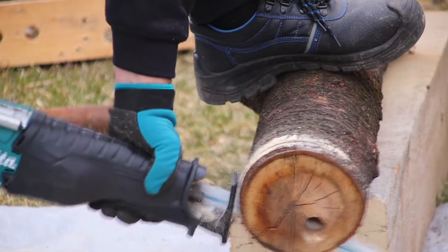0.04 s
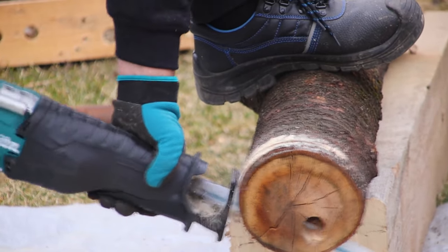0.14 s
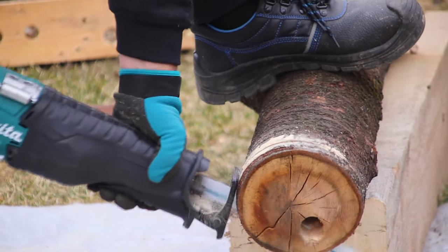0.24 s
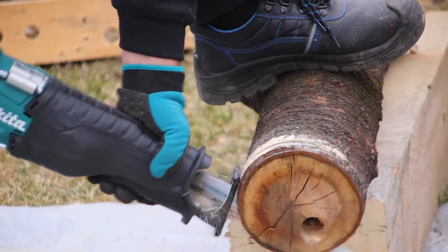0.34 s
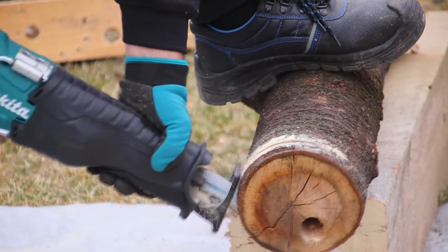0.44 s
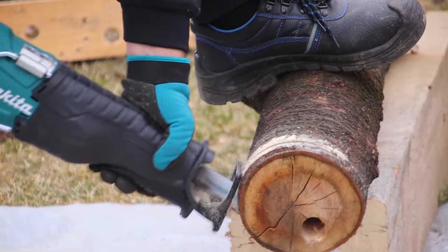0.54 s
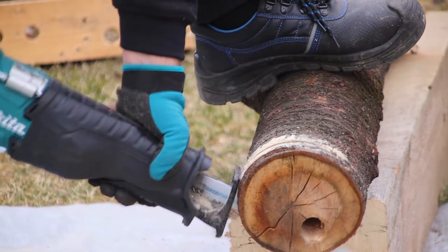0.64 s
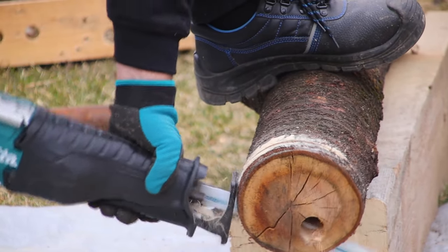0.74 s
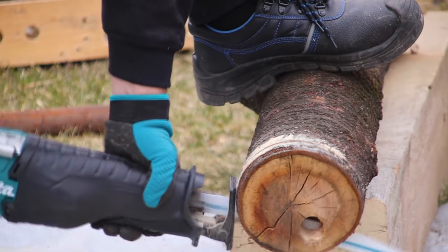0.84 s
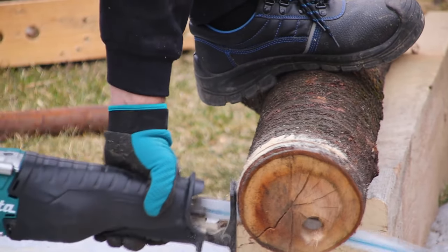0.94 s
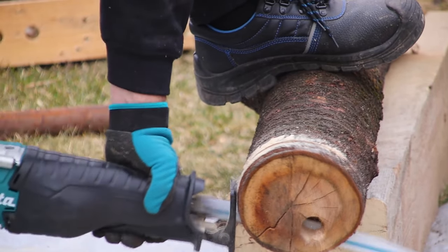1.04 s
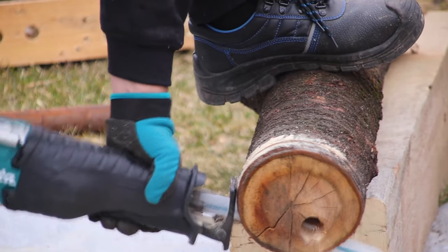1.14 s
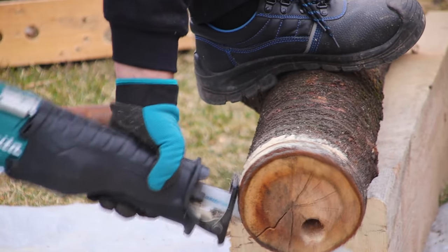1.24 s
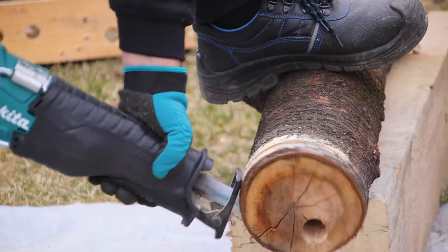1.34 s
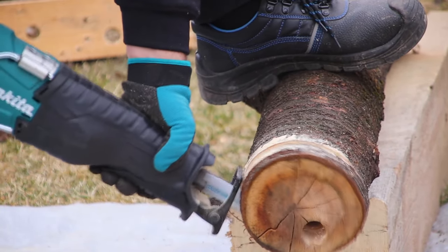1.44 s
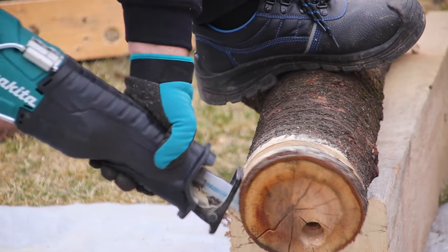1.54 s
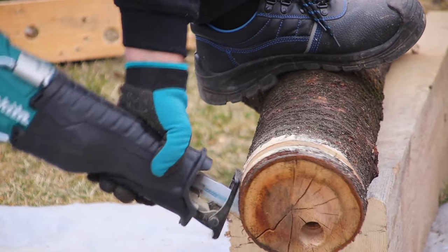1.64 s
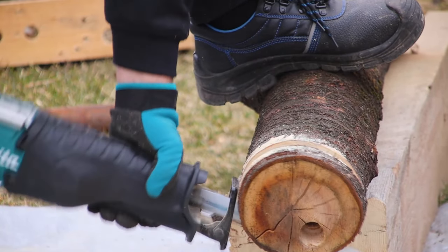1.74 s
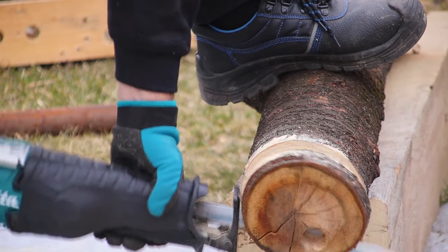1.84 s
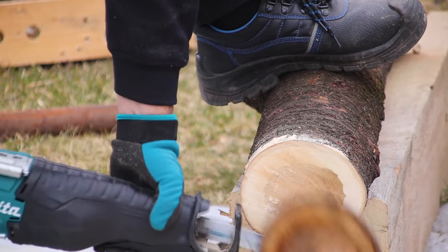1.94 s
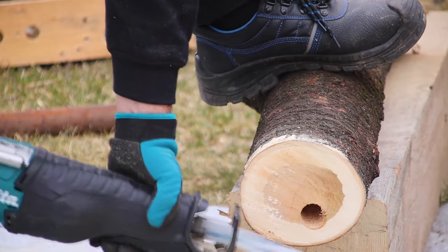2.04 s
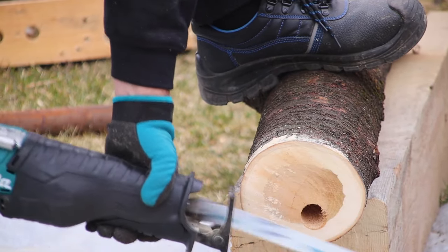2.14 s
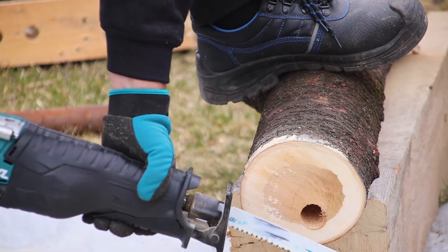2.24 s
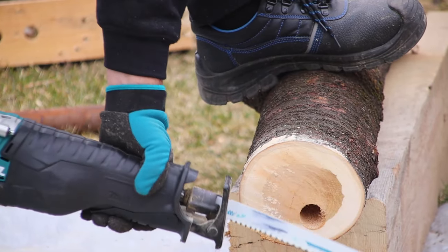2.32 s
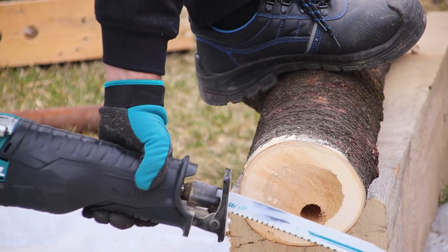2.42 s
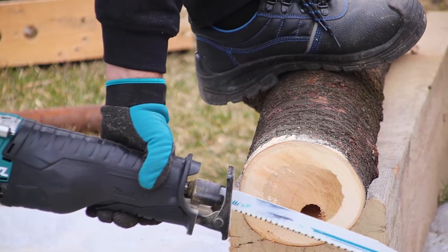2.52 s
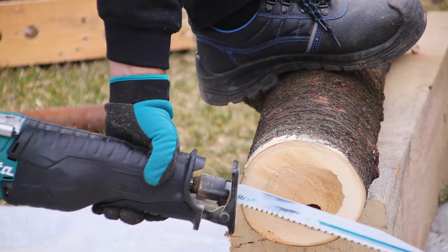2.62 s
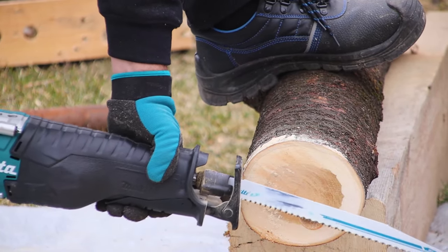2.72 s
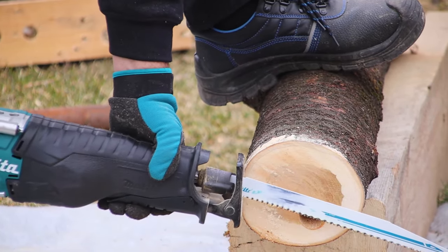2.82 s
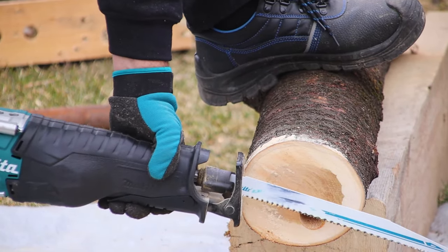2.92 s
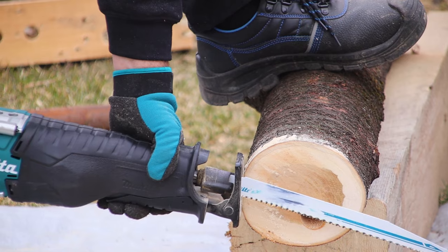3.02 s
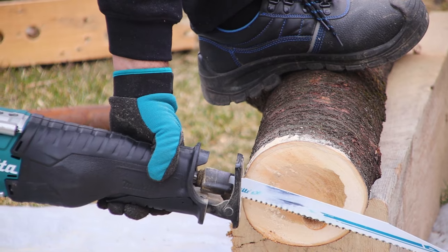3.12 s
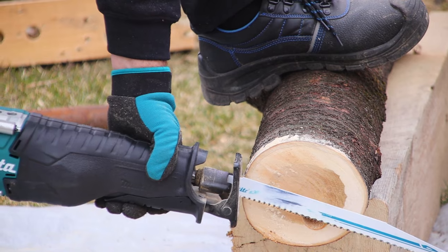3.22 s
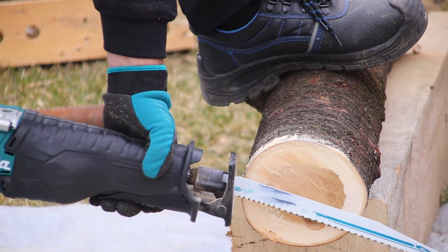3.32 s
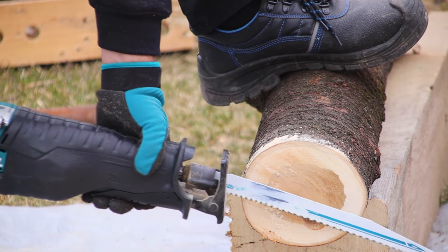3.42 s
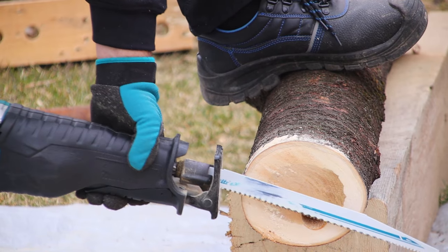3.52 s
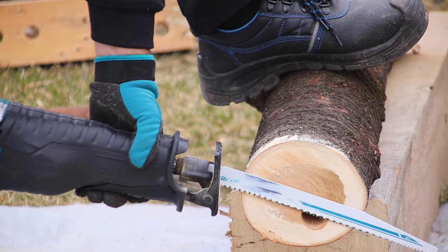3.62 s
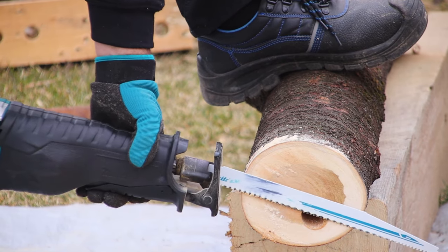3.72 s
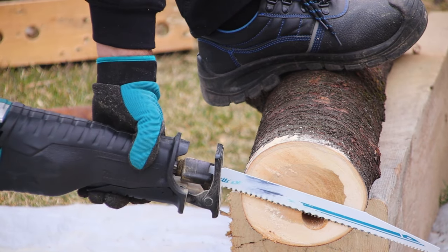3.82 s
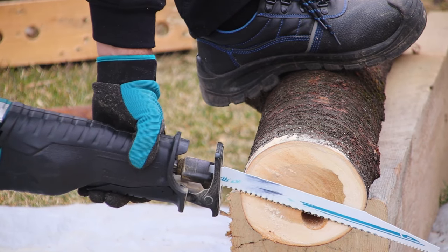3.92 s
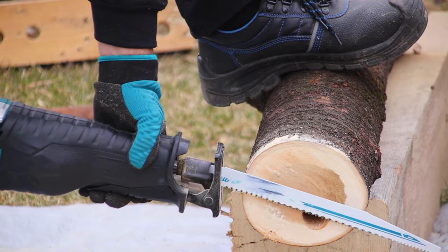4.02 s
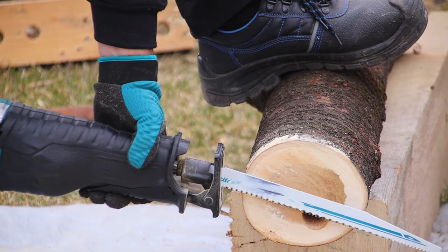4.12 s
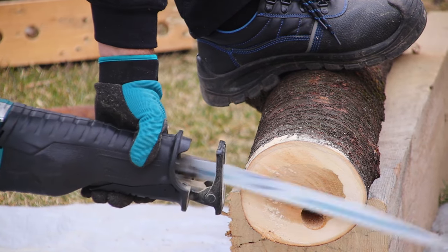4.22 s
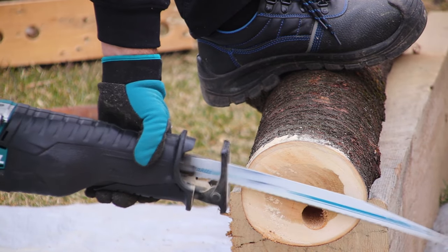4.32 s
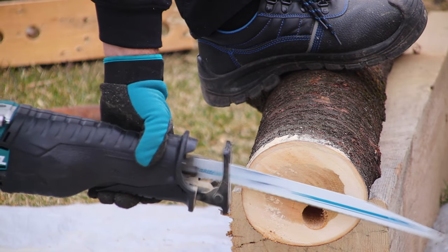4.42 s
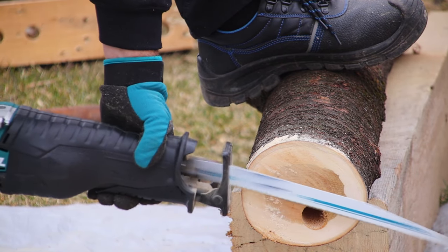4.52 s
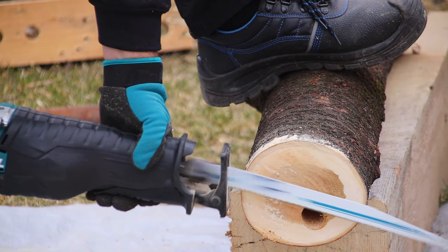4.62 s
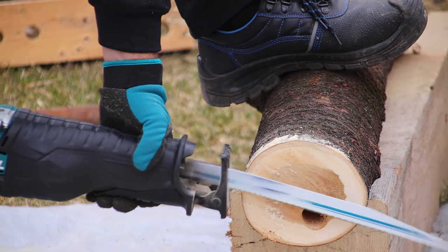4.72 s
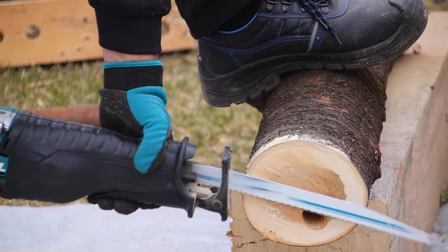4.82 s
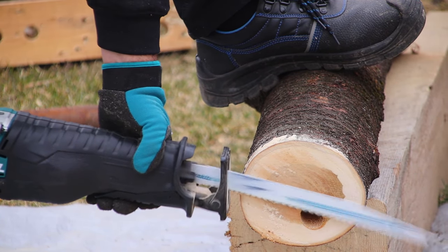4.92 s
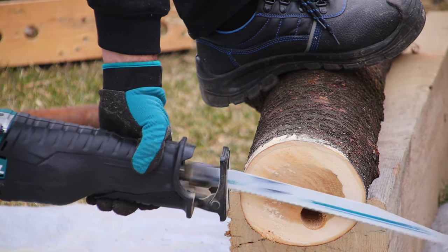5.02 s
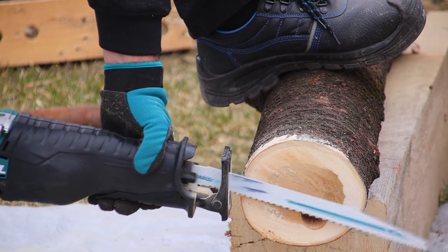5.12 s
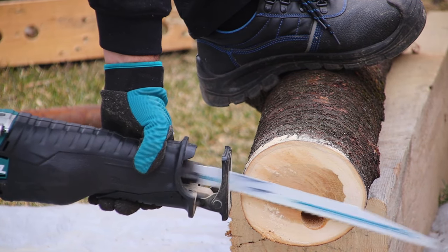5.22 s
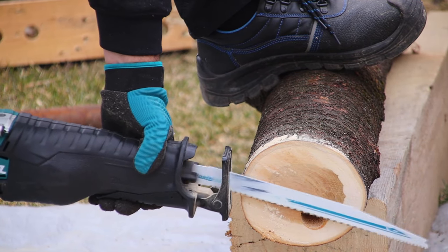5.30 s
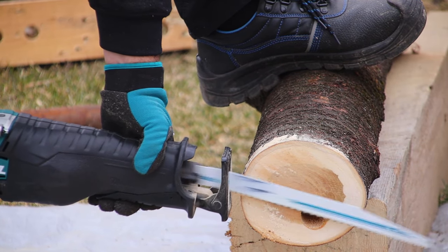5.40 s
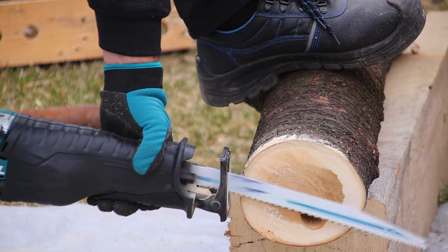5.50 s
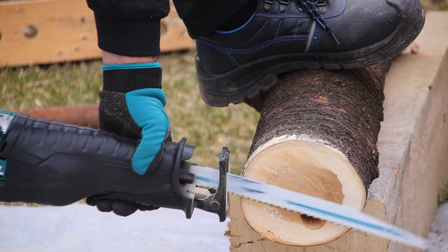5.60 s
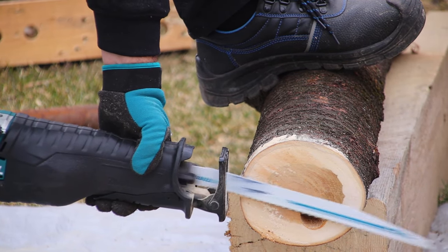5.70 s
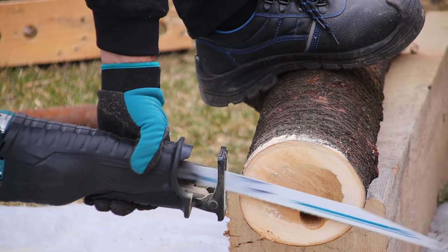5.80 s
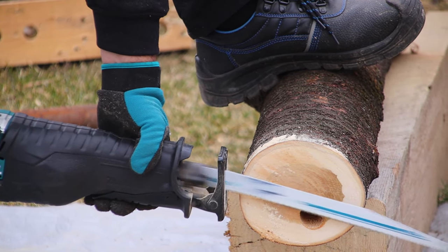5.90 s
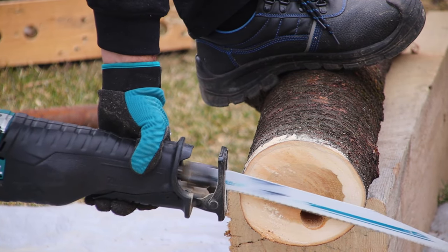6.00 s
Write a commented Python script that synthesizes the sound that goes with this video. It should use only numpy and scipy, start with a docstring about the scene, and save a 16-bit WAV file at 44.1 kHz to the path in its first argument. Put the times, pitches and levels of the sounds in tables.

```python
"""Outdoors, a cordless reciprocating saw cuts through a log; the slice drops off and the motor brakes.
The saw is shifted with scuffs and clicks, then revs up free and sinks to a slow chug, its motor drive singing.
One crank angle times the gear rattle, tooth rasp, shaking log and whines; shaped noise makes the rough
sounds and sine tones the pitched ones. A soft rush, a far hum and faint chirps lie behind."""
import sys
import numpy as np
from scipy import signal
from scipy.fft import rfft, irfft, next_fast_len
from scipy.io import wavfile
from scipy.ndimage import uniform_filter1d, map_coordinates

SR = 44100
rng = np.random.default_rng(int(sys.argv[2]) if len(sys.argv) > 2 else 0)


def put_to_file(sound):
    """Save the sound as 16-bit audio at rate SR, in the file named by the first command-line argument."""
    columns = np.atleast_2d(sound).T  # one column per channel
    safe = np.clip(columns, -1, 1)
    whole_steps = np.round(safe * 32767)
    wavfile.write(sys.argv[1], SR, whole_steps.astype(np.int16))


N = 267246

# Crank speed in the cut, sagging as the saw is pressed in: start_s, strokes_per_s
CUT_SPEED = [(0, 37.44), (.15, 34.54), (.3, 35.6), (.45, 34.48), (.6, 36.22), (.72, 36.95), (.82, 38.93),
             (.94, 39.84), (1.06, 36.38), (1.2, 37.19), (1.36, 37.23), (1.5, 37.43), (1.62, 38.78),
             (1.76, 42.1), (1.95, 40.59), (2.12, 44.5), (2.28, 42.91)]
# Crank speed of the free run, a rev and then a slow chug: start_s, strokes_per_s
FREE_SPEED = [(4.26, 0), (4.35, 25.16), (4.43, 33.6), (4.52, 39.48), (4.62, 33.96), (4.76, 29.54),
              (4.9, 24.98), (5.04, 19.56), (5.2, 13.59), (5.36, 9.63), (5.47, 9.12), (5.6, 11.13),
              (6.06, 10.98)]
CUT_ANGLE, FREE_ANGLE = 1, 0.39  # crank angle as each run starts (turns)
FULL_RATE = 36.07  # full throttle (strokes per second)
MOTOR_TURNS = 47 / 6  # motor turns per stroke
BRAKE_S, SWELL_IN_S = 0.067, 0.17  # brake to rest; the rattle swells in after a start
WOOD_LEFT_S, WOOD_FADE_S = 2.423, 0.35  # when the wood's hold on the blade has faded fully; fade length

# How hard the teeth bite as the saw is rocked: start_s, rasp_db
BITE = [(0, -38.5), (.17, -34), (.5, -34), (.78, -41), (.9, -58), (1.06, -42.5), (1.38, -37), (1.52, -48),
        (2.08, -46.5)]
# Colour of tearing wood: freq_hz, level_db (relative, per Hz)
TEETH_COLOUR = [(70, -53), (130, -6), (330, -10), (650, -7.5), (1000, -11), (2000, -12), (3300, 0),
                (4500, -5), (7000, -15), (10000, -33), (11700, -28), (15800, -21)]
# Resonances of the blade held in the cut: freq_hz, width_hz, lift_db (before the ring factor)
KERF = [(317, 27, 8), (493, 90, 5), (2710, 130, 9.5), (3180, 240, 1.5), (3420, 110, 4.5), (3800, 140, -4.5),
        (4540, 91, 0.5), (4960, 60, 5)]
FULL_BITE_DB = -35
CATCH_TURN, LIFT_TURN, CATCH_DB = 0.675, 0.61, 5  # angle of the catch, turns until the teeth lift, jolt
TEETH_PER_PULL, TOOTH_DECAY, TOOTH_FLOOR = 6, 0.3, 0.25  # count, decay in tooth spacings, steady share
SQUEAL_HZ, SQUEAL_DB, SQUEAL_GROWS = 3220, -43, 1.5  # centre pitch, level at full bite, power of the bite
BLADE_HZ, BLADE_DB = 320, -63.5  # bending hum: resonance, level at full bite away from it

# Colour of the rattle at speed: freq_hz, level_db (relative, per Hz)
FAST_COLOUR = [(35, -61), (60, -31), (200, -15), (436, -11), (632, -14), (897, -2.5), (1330, -3),
               (1850, -6.5), (2500, -5), (3720, -7.5), (4180, -9), (6510, -11.5), (9910, -13), (13100, -13),
               (15800, -20)]
# Colour of the rattle at a slow chug: freq_hz, level_db (relative, per Hz)
SLOW_COLOUR = [(59, -22), (100, -19), (450, -9.5), (650, -10), (1190, 1), (2090, -3), (2800, -6),
               (3400, -5.5), (3950, -12.5), (7600, -7), (8700, -13), (10000, -26.5), (12400, -37),
               (15000, -22)]
# Resonances of housing and blade: freq_hz, width_hz, lift_db (before any ring factor)
HOUSING = [(636, 52, -8), (880, 140, 4.5), (1460, 130, 2.5), (1950, 210, -4.5), (2120, 280, 5),
           (2800, 130, 2), (3630, 220, 3), (5180, 340, 4.5), (6420, 300, 3.5), (7720, 290, 4),
           (8420, 240, 5.5), (10100, 360, -7.5), (13100, 110, -9)]
# Resonances that ring out at a slow chug: freq_hz, width_hz, lift_db
CHUG_RING = [(857, 190, 6), (1855, 210, -7.5), (2105, 105, 13), (3425, 92, 11), (3670, 50, 8),
             (5000, 250, 8.5), (5300, 150, -4), (5840, 70, 2), (6590, 250, 10.5), (6950, 150, -13),
             (7600, 80, 7)]
# The slack slider clatters twice a turn at a slow chug: start_turn, length_turns, strength
CLATTER = [(0.93, 0.27, 0.95), (0.49, 0.21, 0.6)]
# Gearbox growl, relative to the rattle: stroke_multiple, level_db
GROWL = [(9, -26), (10, -26), (12, -26), (14, -27)]
# The hollow of the housing lifts the growl: freq_hz, width_hz, lift_db
HOLLOW = [(445, 38, 6.5)]
# Rattle: a floor at idle, a power of speed above it (both before make-up gain)
IDLE_DB, FULL_DB, RATTLE_GROWS = -44.5, -33, 2.25
WOOD_DAMPS_DB, LOAD_ADDS_DB, RELEASE_T60_S = 4, 1.93, 0.3

# Whine of motor and pinion, relative to the rattle: motor_multiple, cut_db, free_db
WHINE = [(1.5, -25, -26), (3, -21, -24), (5, -24, -23), (6, -17, -25), (8, -17, -23), (12, -22, -40),
         (13, -26, -42), (16, -28, -21)]
# Gearbox resonances that lift the whine: freq_hz, width_hz, lift_db (halved fully in wood)
GEARBOX = [(1750, 170, 10), (3700, 380, 23)]
# Drive tones: switching_multiple, stroke_multiple (added), level_db (relative)
SIDEBANDS = [(1, -46, -10), (1, -32, -5), (1, -8, -5), (1, 8, -8), (1, 32, -6), (2, -32, -17),
             (2, -52, -20), (2, -64, -17)]
# Drive level, slowing at which the motor coasts (strokes per second per s), power of current
DRIVE_DB, COAST_RATE, DRIVE_GROWS = -52, 14, 0.091
# Motor buzz under its starting current: start_s, level_db
START_LEVEL = [(4.255, -71), (4.3, -39.5), (4.345, -43.5), (4.41, -70)]
# Colour of that buzz: freq_hz, level_db (relative, per Hz)
START_COLOUR = [(700, -32), (2000, -12), (3000, 4), (3900, -2), (5000, -6), (8000, -11), (10000, -40)]

# The log shaken by the strokes: stroke_multiple, level_db (relative)
LOG = [(1, -43), (2, -20), (3, -5.5), (4, -2.5), (5, 1), (6, 1), (7, -1.5), (8, -10), (9, -18), (10, -10.5),
       (11, -24), (12, -19.5), (13, -32), (14, -5.5)]
# The log's own resonances: freq_hz, width_hz, lift_db
LOG_MODES = [(121.3, 8.6, 5.5), (189.6, 11.3, 8)]
# How hard the log shakes: start_s, level_db (before a trim)
SHAKE = [(0.0, -45), (0.04, -37.5), (0.5, -50), (0.85, -38.5), (0.9, -45), (1.08, -35.5), (1.47, -42),
         (1.52, -40), (2.08, -50.5)]
# The shoe slaps the log at both ends of the pull: angle_turns, level_db (at full bite)
SLAPS = [(.68, -34.5), (.21, -28)]
SLAP_TURNS = 0.072  # decay of a slap
# The slack slider knocks: start_s, peak_db
KNOCKS = [(4.4868, -18), (4.593, -19), (5.082, -29), (5.1325, -28.5), (5.1428, -24), (5.175, -32),
          (5.215, -29), (5.249, -26), (5.438, -35)]
# Colour of knocks and slaps: freq_hz, level_db (relative, per Hz)
KNOCK_COLOUR = [(100, -23), (500, -10), (900, 2), (2500, -4), (4000, -12.5), (8000, -14), (11000, -21),
                (15800, -22)]
# Dull wooden bumps: start_s, level_db, pitch_hz, t60_s (of the lowest mode)
BUMPS = [(2.13, -32.5, 128, 0.065), (2.151, -30.5, 250, 0.043), (2.761, -36, 122, 0.047),
         (2.785, -34, 147, 0.029)]

# Handling clicks: start_s, peak_db, tilt_db_per_octave (above 2500 Hz)
CLICKS = [(2.7961, -45, 0), (2.8226, -33, 1), (2.8295, -33, 0), (2.8395, -34, -1.5), (2.849, -38, -2),
          (2.875, -37, 1), (2.9415, -40, 0), (3.005, -34, -2.5), (3.0102, -41, -2), (3.0291, -41.5, 0),
          (3.054, -49, 0), (3.7702, -31, 1.5), (4.258, -40, -2.5)]
# Colour of clicks and scuffs: freq_hz, level_db (relative, per Hz)
TICK_COLOUR = [(60, -40), (250, -5.5), (700, 3), (1500, 2.5), (3500, 1.5), (6000, -5), (11000, -12),
               (15800, -10.5)]
# Steel of shoe and blade: pitch_hz, level_db (relative), t60_s
STEEL = [(1450, -2, 0.088), (3350, 4, .036), (3800, -10, 0.031), (4530, -4, 0.061), (9335, -14, .05),
         (12220, -4, .033), (13980, -12, .035)]
STEEL_DB = -18  # ring under each click
# Glove and shoe scuffs: start_s, length_s, level_db
SCUFFS = [(2.729, 0.044, -64), (2.786, 0.028, -55), (2.825, 0.026, -44), (2.864, 0.2, -61.5),
          (3.107, 0.073, -66.5)]
SCUFF_RISE_S, SCUFF_T60_S = 0.005, 0.036

# Surroundings: start_s, rush_db (before a trim), hum_db
AIR = [(2.4, -55.5, -77), (3.3, -56.5, -67), (3.8, -54, -62.5), (4.22, -56, -59), (4.5, -57, -74)]
# Colour of the outdoor rush: freq_hz, level_db (relative, per Hz)
BREEZE_COLOUR = [(15, -47), (25, -27), (59, -11), (157, -15), (211, -16.5), (307, -22), (382, -20.5),
                 (604, -19), (1470, -12.5), (2090, -17.5), (2730, -19.5), (3220, -33), (8270, -44.5),
                 (14600, -43.5), (15800, -40)]
# A band that stands out of the rush: freq_hz, width_hz, lift_db
RUSH_BAND = [(1350, 290, 3.5)]
# Faint high chirps: start_s, length_s, start_hz, end_hz, level_db
CHIRPS = [(3.94, .1, 5100, 4950, -80), (4.075, .075, 5750, 4300, -77), (4.075, .075, 4350, 3300, -74)]
# Nearby ground and timber: delay_s, gain
WALLS = [(.0031, 0.2), (.0057, 0.074), (.0083, 0.13)]
# Decay of the yard: freq_hz, t60_s
YARD = [(150, 0.56), (1500, 0.27), (5000, 0.54), (14000, 0.28)]
# Left-right likeness: freq_hz, likeness
ALIKE = [(100, 0.96), (600, 0.9), (1100, 0.96), (2000, 0.71), (4000, 0.47), (8000, 0.45), (14000, 0.44)]
# Stereo balance: freq_hz, left_minus_right_db
LEFT_LEAD = [(60, 1.5), (99, 1.5), (160, 2.5), (270, 1.0), (450, 0.5), (740, 3), (1220, 4), (2010, -2),
             (3330, 1.5), (5500, 2.5), (9080, 2.5), (15000, 0)]
TOP_HZ = 15800


def amp(db):
    """Decibels to gain."""
    return 10 ** (np.asarray(db) / 20)


def unit(x):
    """x at rms 1."""
    return x / np.sqrt(np.mean(x ** 2) + 1e-20)


def along(points, hz):
    """Read (freq_hz, value) points on a log frequency axis."""
    f, v = np.transpose(points)
    return np.interp(np.log(hz + 1), np.log(f + 1), v)


def curves(rows):
    """One value per sample for each column after the time."""
    s, *cols = np.transpose(rows)
    return [np.interp(np.arange(N) / SR, s, c) for c in cols]


def wobble(rate):
    """A smooth random curve, rate knots a second."""
    knots = rng.standard_normal(int(N * rate / SR) + 4)
    return map_coordinates(knots, [np.arange(N) * rate / SR])


def lifted(hz, resonances):
    """Lift in dB at hz from (freq_hz, width_hz, lift_db) resonances."""
    return sum(lift / (1 + (2 * (hz - f) / width) ** 2) for f, width, lift in resonances)


def filtered(x, response):
    """x times a complex response of frequency."""
    m = next_fast_len(N + SR // 2)
    return irfft(rfft(x, m) * response(np.fft.rfftfreq(m, 1 / SR)), m)[..., :N]


def body(spectrum, resonances=(), ring=1, size=8192):
    """Causal impulse response of energy 1: a broad colour with resonances on top."""
    hz = np.fft.rfftfreq(size, 1 / SR)
    db = along(spectrum, hz) + ring * lifted(hz, resonances)
    # folding the cepstrum gives minimum phase
    cepstrum = irfft(np.log(amp(np.maximum(db, db.max() - 90))))
    cepstrum[1:size // 2] *= 2
    cepstrum[size // 2 + 1:] = 0
    response = irfft(np.exp(rfft(cepstrum)))
    return response / np.linalg.norm(response)


def through(x, response):
    """A pair of signals rings a body."""
    return signal.fftconvolve(x, np.atleast_2d(response), axes=1)[:, :N]


def spread(pair):
    """Two unrelated signals become left and right, alike in the bass and looser in the treble."""
    turn = lambda hz: np.arccos(np.clip(along(ALIKE, hz), -1, 1)) / 2
    mid, side = filtered(pair, lambda hz: np.array([np.cos(turn(hz)), np.sin(turn(hz))]))
    return np.array([mid + side, mid - side])


def grains(rate, scatter_db, hiss):
    """Tiny impacts of uneven size, rate a second, over a share of smooth hiss; rms 1."""
    sizes = amp(scatter_db * np.clip(rng.standard_normal(N), -2, 2))
    hits = (rng.random(N) < rate / SR) * sizes
    return unit(unit(hits * rng.choice([-1, 1], (2, N))) + hiss * rng.standard_normal((2, N)))


def lobe(turns, centre, sharp):
    """A smooth swell once per crank turn."""
    return np.exp(sharp * (np.cos(2 * np.pi * (turns - centre)) - 1))


def burst(turns, start, length):
    """Once per crank turn: a sudden start, a hold and a quick fall."""
    angle = (turns - start) % 1
    return np.clip(angle / 0.017, 0, 1) * np.clip((length - angle) / 0.047 + .5, 0, 1)


def per_stroke(turns, scatter_db):
    """A new strength for each half turn."""
    half = np.floor(2 * turns + .5).astype(int)
    return amp(scatter_db * rng.standard_normal(1024)[half])


def crank_speed(t):
    """Strokes per second: the cut, a hard brake to rest, then the free run."""
    braking = np.clip(1 - (t - CUT_SPEED[-1][0]) / BRAKE_S, 0, 1)
    return curves(CUT_SPEED)[0] * braking + curves(FREE_SPEED)[0]


def crank_angle(t, speed):
    """Turns of the crank: speed summed over time, counted from the start of each run."""
    free = t >= FREE_SPEED[0][0]
    return np.where(free, FREE_ANGLE + np.cumsum(speed * free) / SR, CUT_ANGLE + np.cumsum(speed) / SR)


def effort(t, speed):
    """Load on the teeth, the wood's hold on the blade (0 to 1), and the strength of the rattle."""
    in_wood = np.clip((WOOD_LEFT_S - t) / WOOD_FADE_S, 0, 1)
    load = in_wood * amp(curves(BITE)[0] - FULL_BITE_DB)
    on_log = t < FREE_SPEED[0][0]
    # from rest the rattle grows to full strength
    swell = np.where(on_log, 1, np.clip((t - FREE_SPEED[0][0]) / SWELL_IN_S, 0, 1))
    shaking = amp(FULL_DB) * swell * np.minimum(speed / FULL_RATE, 1.05) ** RATTLE_GROWS
    released_s = np.maximum(t - CUT_SPEED[-1][0], 0)
    change_db = LOAD_ADDS_DB * load - on_log * (WOOD_DAMPS_DB + 60 * released_s / RELEASE_T60_S)
    level = np.hypot(amp(IDLE_DB), shaking) * np.clip(speed / 8, 0, 1) * amp(change_db)
    return load, in_wood, level


def rasp(speed, turns, load):
    """On the pull the teeth catch with a jolt, tear fibres and squeal; on the return they lift."""
    stroke, angle = np.divmod(turns - CATCH_TURN + 1 + 0.0082 * wobble(44), 1)
    engaged = np.clip(angle / 0.044, 0, 1) * np.clip((LIFT_TURN - angle) / 0.1 + .5, 0, 1)
    jolt = 1 + amp(CATCH_DB) * np.exp(-angle / 0.025)
    pull = unit(0.25 + engaged * jolt * per_stroke(stroke / 2, scatter_db=2.7))
    # the teeth pass fastest in mid-pull; each bites suddenly and lets go
    travel = (1 - np.cos(np.pi * np.minimum(angle / LIFT_TURN, 1))) / 2
    passed = TEETH_PER_PULL * travel + .3 * wobble(30)
    bites = unit(TOOTH_FLOOR + engaged * np.exp(-(passed % 1) / TOOTH_DECAY))
    fibres = grains(2800, scatter_db=2.0, hiss=1.2)
    tearing = fibres * unit(pull * bites) * amp(FULL_BITE_DB) * load
    # teeth stick and slip at an unsteady pitch
    slip_hz = SQUEAL_HZ * (1 + .018 * wobble(110))
    squeal_tone = np.sin(2 * np.pi * np.cumsum(slip_hz) / SR)
    squeal = amp(SQUEAL_DB) * engaged * per_stroke(stroke / 2, scatter_db=1.5) * squeal_tone
    bending = blade_hum(speed, turns)
    torn = spread(through(tearing, body(TEETH_COLOUR, KERF, ring=1.2)))
    return torn + np.sqrt(2) * (squeal * load ** SQUEAL_GROWS + bending * load)


def blade_hum(speed, turns):
    """The blade bends at stroke multiples, loudest near its own resonance."""
    hum = 0
    for k in range(8, 11):
        db = BLADE_DB + lifted(k * speed, [(BLADE_HZ, 45, 14)]) + 1.5 * wobble(11)
        hum = hum + amp(db) * np.sin(2 * np.pi * k * turns + .35 * wobble(12))
    return hum


def rattle(speed, turns, level):
    """Gears and slider chatter, hardest at the reversals; slow running is duller and clatters in two bursts."""
    hard = np.clip((speed - 11) / 19, 0, 1)
    loose = turns + 0.012 * wobble(40)  # play in the slider
    # at speed the two reversals crowd together and leave one lull a turn
    reversals = lobe(loose, 0.93, sharp=3.9) + 0.48 * lobe(loose, 0.25, sharp=5.2)
    beat = unit(0.89 + reversals * per_stroke(turns, scatter_db=1.6))
    chug = unit(1 + sum(g * burst(loose, start, length) for start, length, g in CLATTER))
    hiss = grains(4000, scatter_db=1.5, hiss=0.85)
    teeth = tooth_contacts(turns, scatter_db=1.5)
    fast_drive = unit(hiss + .3 * teeth) * beat * level * np.sqrt(hard)
    slow_drive = unit(hiss + .8 * teeth) * chug * level * np.sqrt(1 - hard)
    fast = through(fast_drive, body(FAST_COLOUR, HOUSING, ring=0.73))
    slow = through(slow_drive, body(SLOW_COLOUR, CHUG_RING))
    growl = gearbox_growl(speed, turns) * hard * level  # only at speed
    return spread(amp(4.0) * fast + amp(2.5) * slow) + np.sqrt(2) * growl


def tooth_contacts(turns, scatter_db, count=47):
    """Each crank-gear tooth knocks with a strength of its own, varied a little each turn; rms 1."""
    tooth = np.floor(count * turns).astype(int)
    own = rng.choice([-1, 1], (2, count)) * amp(scatter_db * (2 * rng.random(count) - 1))
    own -= own.mean(axis=1, keepdims=True)
    contact = np.diff(tooth, prepend=tooth[0])
    return unit(contact * own[:, tooth % count] * (1 + 0.44 * rng.standard_normal(N)))


def gearbox_growl(speed, turns):
    """Low multiples of the stroke rate, lifted by the hollow of the housing."""
    growl = 0
    for k, db in GROWL:
        gain = amp(db + lifted(k * speed, HOLLOW) + 2.5 * wobble(30))
        growl = growl + gain * np.sin(2 * np.pi * k * turns + .35 * wobble(25))
    return growl


def log_shake(speed, turns, in_wood):
    """Tugged each stroke, the wood answers later at higher multiples and louder near its resonances."""
    shake = 0
    for k, db in LOG:
        gain = amp(db + lifted(k * speed, LOG_MODES) + 1.4 * wobble(8.62))
        phase = 2 * np.pi * k * (turns - .25) - 0.2305 * k * k + 0.3 * wobble(12)
        shake = shake + gain * np.cos(phase)
    return amp(curves(SHAKE)[0] - 4.5) * in_wood * np.minimum(speed / FULL_RATE, 1) ** 2 * unit(shake)


def shoe_slaps(turns, load):
    """The pull snatches the log against the shoe and the reversal throws it off: two dull knocks a stroke."""
    blows = sum(amp(db) * np.exp(-((turns - angle) % 1) / SLAP_TURNS) for angle, db in SLAPS)
    return spread(through(rng.standard_normal((2, N)) * blows * load, body(KNOCK_COLOUR, HOUSING)))


def gear_whine(speed, turns, level, in_wood):
    """Motor orders sing out where they cross a resonance; the wood damps that and makes them rough."""
    lurch = turns + .001 * np.sin(2 * np.pi * turns) + .0005 * wobble(140)
    ring, rough = 1 - in_wood / 2, .35 + .9 * in_wood
    mesh = 0
    for k, cut_db, free_db in WHINE:
        order = k * MOTOR_TURNS
        balance = amp(free_db + (cut_db - free_db) * in_wood)
        gain = amp(ring * lifted(order * speed, GEARBOX) + 3 * wobble(70))
        mesh = mesh + balance * gain * np.sin(2 * np.pi * order * lurch + rough * wobble(130))
    return np.sqrt(2) * level * speed / FULL_RATE * mesh


def drive_tone(t, speed, turns):
    """In the free run the switching tone splits with speed; silent when coasting or at full throttle."""
    gaining = np.gradient(speed) * SR
    current = np.maximum(1 + gaining / COAST_RATE, 0) * (speed > 0)
    throttled = np.clip(1 - speed / FULL_RATE, 0, 1) * (t > FREE_SPEED[0][0])
    strength = uniform_filter1d(current ** DRIVE_GROWS * throttled, size=1200)
    switching_hz = 7952
    tones = 0
    for m, k, db in SIDEBANDS:
        cycles = m * switching_hz * t + k * turns + .4 * rng.random((2, 1))
        tones = tones + amp(db + 2.4 * wobble(25)) * np.sin(2 * np.pi * cycles)
    return np.sqrt(2) * amp(DRIVE_DB) * strength * tones


def start_buzz(t, turns):
    """A short, rough buzz as the motor takes up the crank, pulsing with each motor turn."""
    pulsing = unit(1 + .6 * np.cos(2 * np.pi * MOTOR_TURNS * turns))
    on = (t > START_LEVEL[0][0]) & (t < START_LEVEL[-1][0])
    drive = rng.standard_normal((2, N)) * pulsing * on * amp(curves(START_LEVEL)[0])
    return spread(through(drive, body(START_COLOUR)))


def knocks():
    """Single hard knocks of the slider ring the housing."""
    t = np.arange(SR // 20) / SR
    out = np.zeros((2, N))
    for s, db in KNOCKS:
        strike = rng.standard_normal((2, len(t))) * amp(-60 * t / 0.022)
        knock = through(strike, body(KNOCK_COLOUR, HOUSING))
        out[:, round(s * SR):][:, :knock.shape[1]] += amp(db) * knock / np.abs(knock).max()
    return spread(out)


def bumps():
    """Wood lands softly: a low mode and two faster-dying ones above it."""
    t = np.arange(SR // 4) / SR
    out = np.zeros(N)
    for s, db, hz, t60 in BUMPS:
        modes = 0
        for ratio, g in [(1, 0.82), (2.3, 0.78), (4.2, 0.8)]:
            modes = modes + g * np.sin(2 * np.pi * hz * ratio * t) * amp(-60 * t * np.sqrt(ratio) / t60)
        out[round(s * SR):][:len(t)] += amp(db) * modes * (1 - np.exp(-t / 0.0021))
    return out


def handling():
    """Short clicks ring the steel of the saw's shoe and blade over a gritty scuff."""
    t = np.arange(SR // 15) / SR
    decay = amp(-60 * t / .009) + .12 * amp(-60 * t / .03)
    out = np.zeros((2, N))
    for s, db, tilt_db in CLICKS:
        tilted = lambda hz: tilt_db * np.log2(max(hz / 2500, 1))
        colour = [(hz, level + tilted(hz)) for hz, level in TICK_COLOUR]
        click = through(rng.standard_normal((2, len(t))) * decay, body(colour))
        ring = 0
        for hz, level, t60 in STEEL:
            gain = amp(level + tilted(hz) + rng.normal(0, 2.0, (2, 1)) - 60 * t / t60)
            ring = ring + gain * np.sin(2 * np.pi * (hz * t + rng.random((2, 1))))
        out[:, round(s * SR):][:, :click.shape[1]] += amp(db) * click / np.abs(click).max()
        out[:, round(s * SR):][:, :len(t)] += amp(db + STEEL_DB) * ring / 2
    grit = grains(2400, scatter_db=7.5, hiss=0.3) * scuffing()
    return spread(out + through(grit, body(TICK_COLOUR)))


def scuffing():
    """Each scuff rises quickly, holds and dies away."""
    t = np.arange(N) / SR
    level = 0
    for s, length, db in SCUFFS:
        rise = np.clip(1 + (t - s) / SCUFF_RISE_S, 0, 1)
        level = level + rise * amp(db - 60 * np.maximum(t - s - length, 0) / SCUFF_T60_S)
    return level


def yard(x):
    """A faint, short answer from the timber and walls nearby: noise decaying at its own pace in each band."""
    hz, t, z = signal.stft(rng.standard_normal((2, SR // 2)), SR, nperseg=256)
    tail = signal.istft(z * amp(-60 * t / along(YARD, hz)[:, None]), SR, nperseg=256)[1]
    return spread(through(x, tail / np.linalg.norm(tail[0])))


def surroundings():
    """Shaped noise makes a soft outdoor rush; sines make a far-off low hum and a few falling chirps."""
    rush_db, hum_db = curves(AIR)
    rush = spread(through(rng.standard_normal((2, N)), body(BREEZE_COLOUR, RUSH_BAND)))
    rush = rush * amp(rush_db - 0.5 + 0.83 * wobble(6.75))
    hum = np.sin(2 * np.pi * 66 * np.arange(N) / SR + 0.97 * wobble(4.3))
    far = amp(hum_db + 0.78 * wobble(4.62)) * hum
    for s, length, start_hz, end_hz, db in CHIRPS:
        glide = np.linspace(start_hz, end_hz, round(length * SR))
        chirp = np.hanning(len(glide)) * np.sin(2 * np.pi * np.cumsum(glide) / SR)
        far[round(s * SR):][:len(glide)] += amp(db) * chirp
    return rush + far


def scene():
    """Saw and log in the open, louder on the left in most bands, the near sounds a hair earlier there."""
    t = np.arange(N) / SR
    speed = crank_speed(t)
    turns = crank_angle(t, speed)
    load, in_wood, level = effort(t, speed)
    bright = rasp(speed, turns, load) + rattle(speed, turns, level) + shoe_slaps(turns, load)
    bright = bright + start_buzz(t, turns) + knocks() + handling()
    # close reflections ripple the treble
    echoes = lambda hz: sum(g * np.exp(-2j * np.pi * hz * s) for s, g in WALLS)
    near = filtered(bright, lambda hz: 1 + np.clip(hz / 1500, 0, 1) * echoes(hz))
    near = near + log_shake(speed, turns, in_wood) + gear_whine(speed, turns, level, in_wood) + bumps()
    lag_s = 3.4e-5  # right behind left
    sides = np.array([[1], [-1]])
    near = filtered(near, lambda hz: np.exp(1j * np.pi * hz * lag_s * sides))
    near = near + drive_tone(t, speed, turns)
    mix = near + amp(-17.5) * yard(near) + surroundings()
    return filtered(mix, lambda hz: amp(sides * along(LEFT_LEAD, hz) / 2))


def record(dry):
    """Cut everything from the band limit upward."""
    return filtered(dry, lambda hz: hz < TOP_HZ)


dry = scene()
out = record(dry)
put_to_file(out)
```